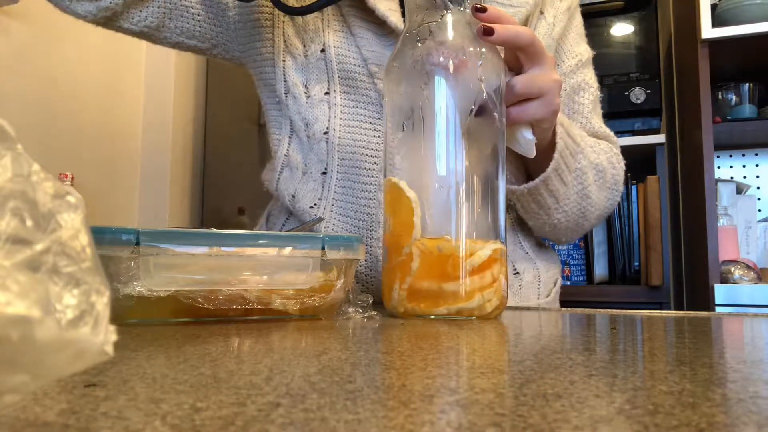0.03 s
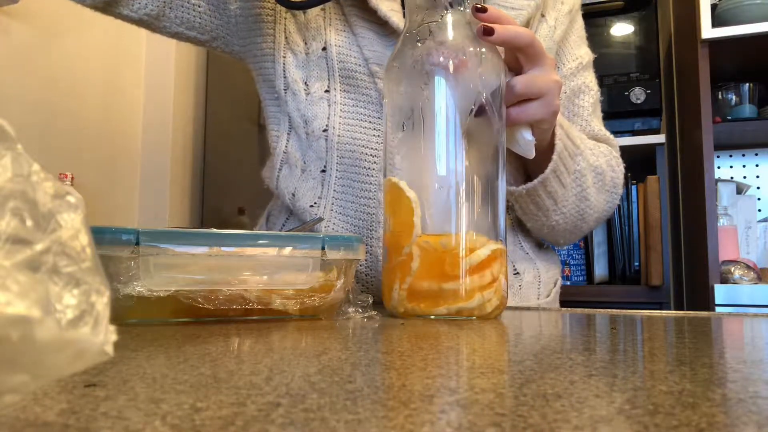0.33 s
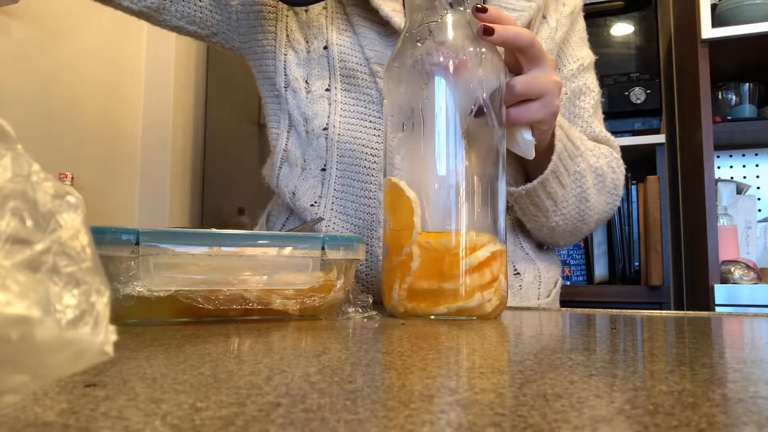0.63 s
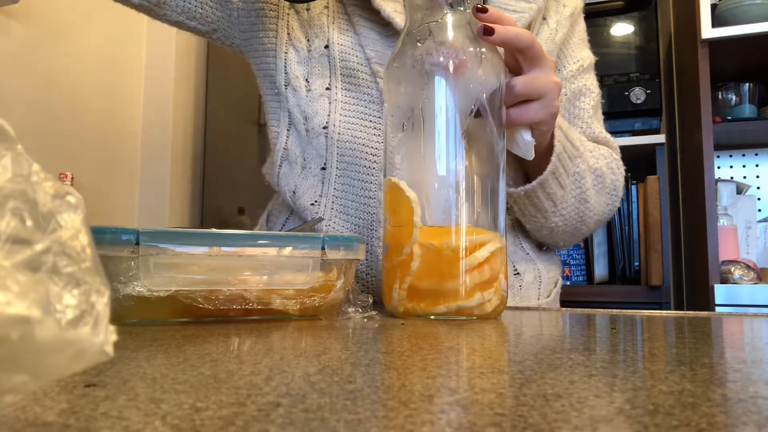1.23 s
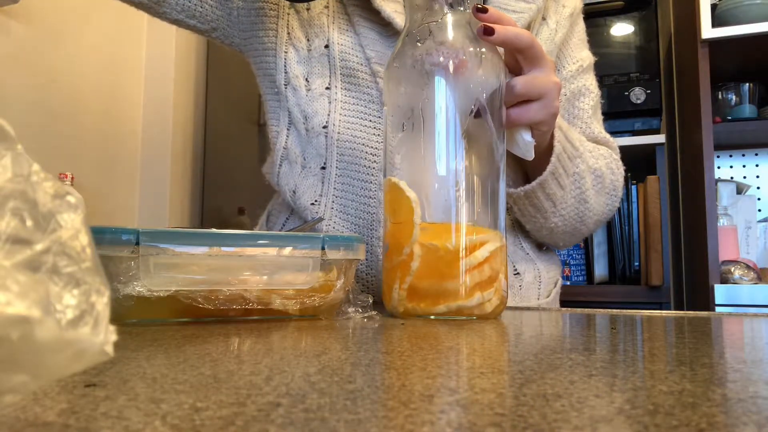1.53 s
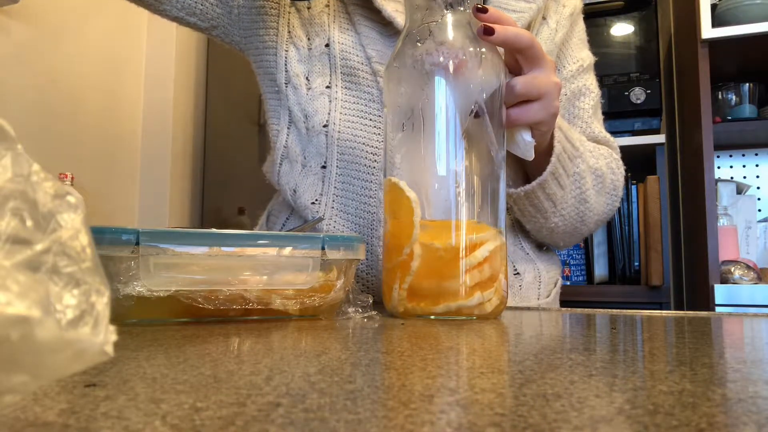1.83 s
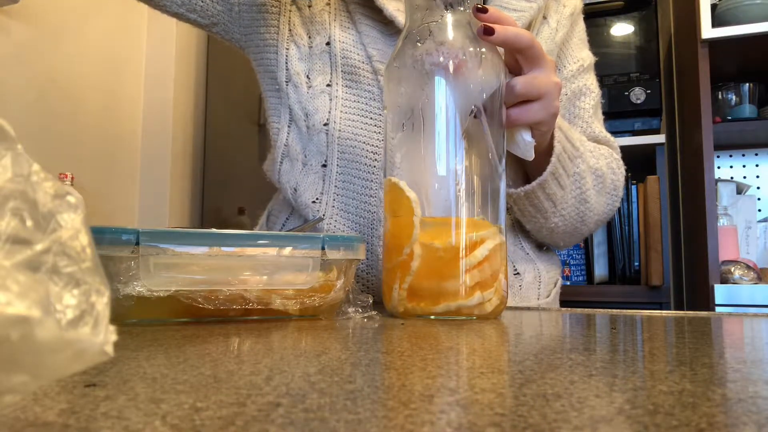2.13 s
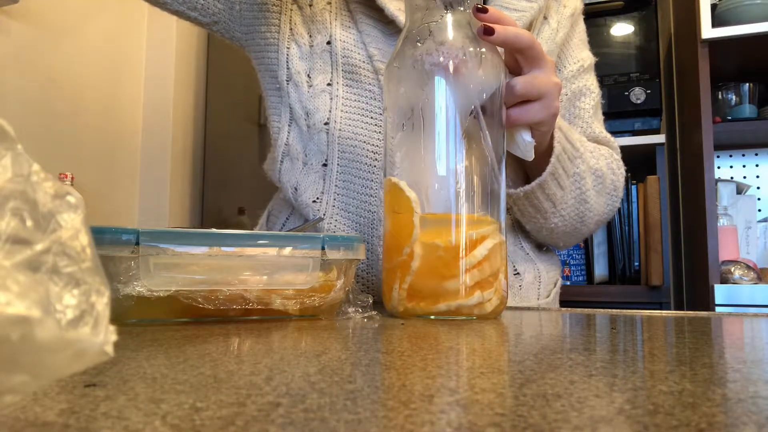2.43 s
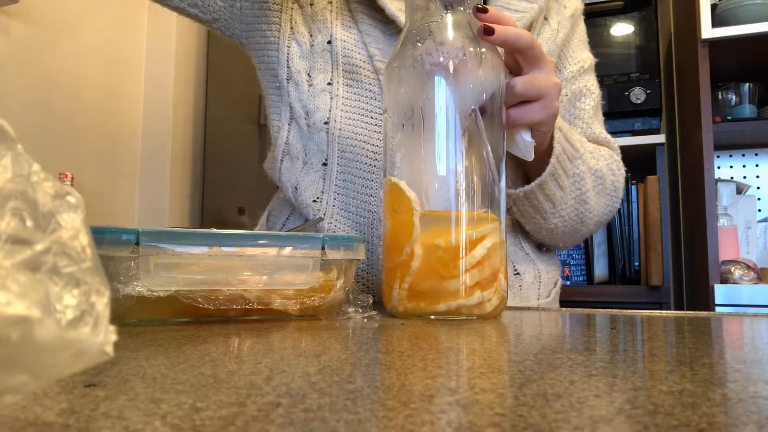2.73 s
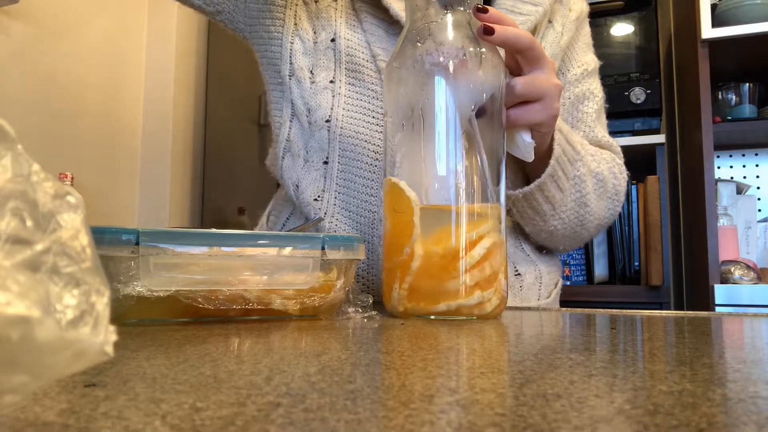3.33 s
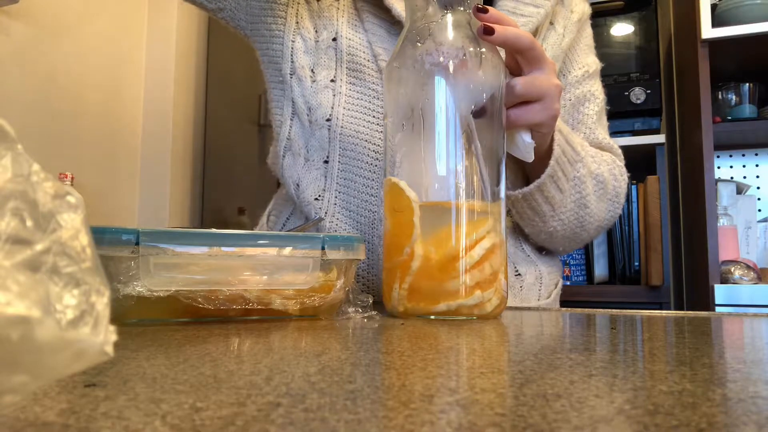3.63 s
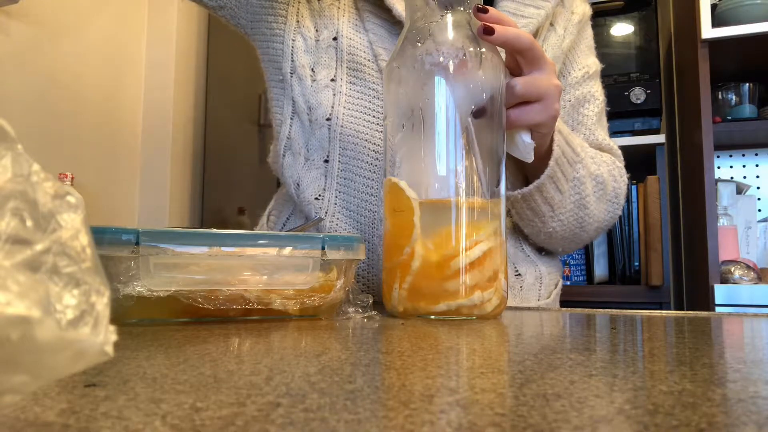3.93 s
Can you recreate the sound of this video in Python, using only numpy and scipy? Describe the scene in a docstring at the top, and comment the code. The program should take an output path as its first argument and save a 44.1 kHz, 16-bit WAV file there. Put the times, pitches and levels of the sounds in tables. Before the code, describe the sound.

A thin pour into a glass bottle starts as light drips and bubbles, with two soft knocks early on, then grows into splashing and gurgling. It is heard up close in a quiet kitchen with steady, low background noise.

```python
"""Filling a glass bottle

Kitchen counter, microphone close to the bottle. A thin stream is poured in: at first it only drips
and ticks, then the flow swells, splashes and gulps. Its bubbles ring the air in the bottle.
A soft double bump comes early on, and low, steady room tone lies under it all."""
import sys
import numpy as np
from scipy import signal
from scipy.fft import rfft, irfft
from scipy.io import wavfile

SR = 44100
rng = np.random.default_rng(int(sys.argv[2]) if len(sys.argv) > 2 else 0)


def dump_mix(stems):
    """Bounce the given channels to the path in sys.argv[1] as a 16-bit WAV at rate SR."""
    frames = np.atleast_2d(stems).T  # one column per channel
    limited = np.clip(frames, -1, 1)  # hard clip at full scale
    pcm = np.round(limited * 32767).astype(np.int16)
    wavfile.write(sys.argv[1], SR, pcm)


N = 176400
TIME = np.arange(N) / SR

# strength of the stream: t/s, level/dB
STREAM_FLOW = [(0, -18), (.7, -20.5), (1.0, -11), (1.4, -18), (1.8, -10), (2.35, -22), (2.58, -14.5),
               (2.7, -3.5), (2.95, -14.5), (3.14, -1.5), (3.3, -3.5), (3.5, -1), (3.75, -2.5), (4, -3)]


def undb(db):
    """Decibels to gain."""
    return 10 ** (np.asarray(db) / 20)


def level(x, db):
    """Scale to an rms level."""
    return x * undb(db) / np.sqrt(np.mean(x ** 2))


def unit_energy(x):
    """Scale so that the squares sum to one."""
    return x / np.sqrt(np.sum(x ** 2))


def fade(t, t60):
    """Exponential decay, 60 dB down at t60."""
    return np.exp(-np.log(1000) * t / t60)


def curve(points):
    """Gain over time from points of t/s, level/dB."""
    return undb(np.interp(TIME, *np.array(points).T))


def wander(per_s):
    """A random drift with a spread near 1."""
    return 1.2 * np.interp(TIME * per_s, np.arange(1000), rng.standard_normal(1000))


def filtered(x, kind, hz, order=2):
    """A gentle low-pass or high-pass."""
    return signal.sosfilt(signal.butter(order, hz, kind, fs=SR, output="sos"), x)


def colour(x, points):
    """Filter by a spectrum of f/Hz, level/dB."""
    hz, db = np.array(points).T
    log_hz = np.log(np.fft.rfftfreq(N, 1 / SR) + 1)
    return irfft(rfft(x) * undb(np.interp(log_hz, np.log(hz), db)), N)


def add(out, start, sound, db):
    """Mix a sound in at a time and a peak level."""
    i = int(np.clip(start * SR, 0, N - 1))
    out[i:i + len(sound)] += (sound * undb(db) / np.abs(sound).max())[:N - i]


def burst(decay_s):
    """A short spatter of noise."""
    t = TIME[:SR // 20]
    return rng.standard_normal(len(t)) * np.exp(-t / decay_s)


def room_tone():
    """The low, steady noise of the kitchen."""
    # noise spectrum: f/Hz, level/dB
    spectrum = [(20, -41), (40, -21), (65, -11.5), (110, -10), (145, -2.5), (161, -6.5), (185, -1),
                (225, -0.5), (255, -4.5), (310, 0), (400, -4.5), (540, -10.5), (760, -11), (1100, -15.5),
                (1600, -23.5), (2200, -28.5), (3500, -38), (6000, -41), (9000, -44.5), (15500, -51)]
    return level(colour(rng.standard_normal(N), spectrum), -52.5)


def bubble(hz, cycles, rise):
    """A bubble rings down 60 dB over `cycles` while its pitch climbs by the share `rise`."""
    age = np.arange(int(cycles * SR / hz) + 2) * hz / SR / cycles
    return np.sin(2 * np.pi * cycles * age * (1 + rise * age / 2)) * fade(age, 1)


def swarm(per_s, low_hz, high_hz, cycles, rise, spread_db, tilt_db):
    """Bubbles of random time, pitch and size; the tilt is per octave."""
    out = np.zeros(N)
    for when, pitch, size, life in rng.random((4000, 4))[:int(per_s * N / SR)]:
        hz = low_hz * (high_hz / low_hz) ** pitch
        db = spread_db * min(-np.log(size), np.pi) + tilt_db * np.log2(hz / low_hz)
        add(out, when * N / SR, bubble(hz, cycles * (.5 + life), rise), db)
    return out


def in_bottle(x):
    """A sound rings the air in the bottle; the dense high resonances differ from spot to spot."""
    # air resonances: f/Hz, width/Hz, level/dB over the direct sound
    air_modes = [(330, 21.3, 19.5), (480, 75, 14.5), (1451, 39, 13.5), (1713, 100, 14), (2620, 83, 15.5),
                 (2946, 143, 18.5), (3165, 10, -13), (3720, 40, 1), (4420, 55, 16), (5770, 100, 10),
                 (6150, 118, 15)]
    t = TIME[:SR // 6]
    direct = signal.unit_impulse(len(t))
    ring = np.zeros(len(t))
    for hz, width, db in air_modes:
        envelope = undb(db) * 2 * np.pi * width / SR * np.exp(-np.pi * width * t)
        ring += envelope * np.cos(2 * np.pi * hz * t)
    shimmer = filtered(rng.standard_normal(len(t)) * fade(t, t60=0.039), "high", hz=3500)
    return signal.fftconvolve(x, direct + ring + unit_energy(shimmer))[:N]


def stream():
    """The stream beats in small bright bubbles and large dull ones, louder with the flow."""
    trickle = swarm(per_s=520, low_hz=765, high_hz=6500, cycles=12.3, rise=0.11,
                    spread_db=3.5, tilt_db=-2)
    burble = swarm(per_s=160, low_hz=206, high_hz=805, cycles=4.9, rise=0.29,
                   spread_db=0, tilt_db=-8.5)
    flow = curve(STREAM_FLOW)
    return level(in_bottle(trickle * flow), -64) + level(in_bottle(burble * flow), -59.5)


def hollow_hum():
    """The stream keeps the air in the bottle humming on its lowest note."""
    hz = 328 * (1 + 0.01208 * wander(per_s=40))
    tone = np.sin(2 * np.pi * np.cumsum(hz) / SR)
    swell = curve(STREAM_FLOW) ** 0.69  # 0.69 dB of hum per dB of flow
    flutter = undb(wander(per_s=30))
    return level(tone * swell * flutter, -60)


def froth():
    """Bursting froth at one spot: high ticks over a fine fizz."""
    pops = swarm(per_s=250, low_hz=3500, high_hz=16600, cycles=20, rise=0.076,
                 spread_db=5, tilt_db=4.5)
    fizz = filtered(rng.standard_normal(N), "high", hz=3500)
    return level(pops, 0) + level(fizz, -16)


def spray(spots=5):
    """Froth at several spots of the surface, coming in quick surges."""
    # strength of the fine spray: t/s, level/dB
    swell = [(0, -11.5), (.8, -12.5), (1.05, -7), (1.4, -7.5), (1.7, -11), (2.0, -8), (2.38, -12),
             (2.58, -4), (2.7, 1.5), (2.87, -5), (2.97, 1), (3.06, -2.5), (3.14, 5), (3.2, -0.5), (3.42, 1),
             (3.55, -3), (3.75, -3), (4, -4.5)]
    # tone shaping of the spray: f/Hz, level/dB
    shaping = [(2500, -12), (4400, 2.5), (5200, -1.5), (6200, 0), (7500, -4.5), (9500, -0.5), (12300, 2),
               (14000, 2), (15500, 1.5)]
    surge_db = 3.5 * np.clip(wander(per_s=46), -2, 2)
    strength = curve(swell) * undb(surge_db)
    wet = sum(in_bottle(froth() * strength) for _ in range(spots))
    return level(colour(wet, shaping), -71.5)


def drips():
    """Single drops each leave a small ringing bubble."""
    # drops: t/s, relative level/dB, f/Hz
    drops = [(.018, -51.5, 2940), (0.205, -51.5, 3030), (0.258, -49.5, 2900), (0.49, -52, 2600),
             (0.501, -54, 3000), (.686, -48, 2800), (.894, -58, 2940), (0.938, -54, 2950),
             (0.966, -49.5, 2780), (.985, -55, 2480), (1.017, -56, 2870), (1.285, -55, 2900),
             (1.3, -47.5, 2930), (1.551, -50.5, 2920), (1.667, -53, 2700), (1.679, -57, 2950),
             (1.71, -61, 2980), (1.762, -57, 2690), (1.741, -46.5, 2800), (1.783, -53, 2620),
             (1.835, -51, 2620), (1.875, -59, 2680), (1.897, -54.5, 2900), (1.985, -46.5, 2610),
             (2.021, -59, 3300), (2.037, -49.5, 2990), (2.07, -49.5, 3500), (2.165, -57, 2640),
             (2.18, -49.5, 3360), (2.197, -56, 2860), (2.22, -53.5, 6300), (2.275, -49.5, 5160),
             (2.497, -47.5, 6150), (2.557, -47, 4200), (2.687, -47, 4670), (2.728, -41.5, 2800),
             (2.741, -43.5, 6150), (2.868, -46, 5900), (2.976, -48, 2620), (3.211, -43, 3200),
             (3.222, -39.5, 2600), (3.451, -42, 3220), (3.489, -43.5, 3860), (3.858, -43.5, 2930),
             (3.995, -34, 2350)]
    out = np.zeros(N)
    for start, db, hz in drops:
        add(out, start, in_bottle(bubble(hz, cycles=24.4, rise=0.036)), db - 0.5)
    return out


def ticks():
    """Droplets tick on the glass, some dull, some bright."""
    # droplet hits: t/s, relative level/dB, treble gain/dB
    droplets = [(0.214, -47.5, -8), (0.491, -52.5, 1), (0.82, -53, 8), (0.948, -53, 5), (1.104, -51, 16),
                (1.196, -57, -4), (1.385, -56, -9), (1.531, -50, -8), (1.575, -56, 19), (1.634, -59, 9),
                (1.753, -55, -13), (1.781, -50, -19), (1.797, -74, -3), (1.887, -53, -6), (2.269, -53, 6),
                (2.406, -57, 3), (2.445, -56, -6), (2.544, -48, 7), (2.623, -56, 12), (2.667, -48, 0),
                (2.853, -49, -7), (3.094, -55, -17), (3.256, -47, -12), (3.381, -42.5, 8), (3.493, -51, 11),
                (3.538, -40, 8), (3.667, -48, 15), (3.877, -50.5, 7), (3.963, -58, -15)]
    out = np.zeros(N)
    for start, db, treble_db in droplets:
        tick = burst(decay_s=0.00095)
        dull = filtered(tick, "low", hz=7500, order=1)
        add(out, start, in_bottle(dull + undb(treble_db) * (tick - dull)), db + 3.5)
    return out


def squirts(width_hz=720):
    """Air and liquid squirt in narrow hisses that swell, glide and fade."""
    # fizzy squirts: t/s, length/s, relative level/dB, first f/Hz, last f/Hz
    hisses = [(0.333, 0.031, -50, 1853, 1720), (0.455, 0.015, -47, 1470, 1790),
              (0.544, 0.025, -50, 1413, 1340), (1.166, 0.093, -55, 2700, 3100),
              (1.305, 0.036, -52.5, 1086, 1560), (1.308, .06, -64.5, 3500, 3600),
              (3.12, 0.034, -51.5, 5440, 5540), (3.372, 0.06, -51, 4180, 3670),
              (3.474, 0.046, -50, 2466, 1880), (3.782, 0.02, -60, 4930, 4900)]
    out = np.zeros(N)
    for start, length, db, first_hz, last_hz in hisses:
        t = TIME[:int(length * SR)]
        grain = filtered(rng.standard_normal(N)[:len(t)], "low", width_hz / 2)
        phase = 2 * np.pi * np.cumsum(np.linspace(first_hz, last_hz, len(t))) / SR
        swell = np.sin(np.pi * t / length) ** .5
        add(out, start, grain * np.sin(phase) * swell, db - 1.5)
    return out


def bumps(contact_s=0.00094):
    """The pouring vessel knocks softly against the bottle, twice."""
    # contacts: t/s, relative level/dB
    contacts = [(1.259, -36.5), (1.288, -33.5)]
    # resonances of a knock: f/Hz, level/dB, t60/s
    modes = [(195, -0.5, 0.073), (308, 7.5, 0.2), (357, 8.5, 0.15), (488, 2.5, 0.1), (590, 0, 0.074),
             (780, -9, 0.057), (910, -22, 0.068)]
    out, t = np.zeros(N), TIME[:SR // 2]
    knock = sum(undb(db) * np.cos(2 * np.pi * hz * t) * fade(t, t60) for hz, db, t60 in modes)
    for start, db in contacts:
        add(out, start, knock * np.minimum(t / contact_s, 1), db + 1.5)
    return out


def splashes():
    """The stream slaps the surface, then scatters droplets."""
    # slaps: t/s, relative level/dB, f/Hz
    slaps = [(2.632, -46, 2980), (2.666, -49, 2800), (2.686, -43, 2590), (2.846, -40, 1890),
             (2.868, -41.5, 1770), (2.897, -42.5, 1740), (2.916, -48, 2400), (2.949, -45, 2000),
             (3.028, -38, 3200), (3.08, -43, 2210), (3.275, -37.5, 2230), (3.363, -46, 1660),
             (3.476, -43, 1850), (3.512, -37.5, 1660), (3.58, -49, 1780), (3.612, -37, 1200),
             (3.625, -45, 2800), (3.712, -32, 1430), (3.761, -41, 1430), (3.801, -37, 1390),
             (3.918, -50, 2500)]
    out = np.zeros(N)
    for start, db, hz in slaps:
        spatter = undb(-3) * unit_energy(burst(decay_s=0.0027))
        hits = signal.unit_impulse(len(spatter)) + spatter
        splash = np.convolve(bubble(hz, cycles=5.8, rise=0), hits)
        add(out, start, in_bottle(splash), db - 1.5)
    return out


def gulps(attack_s=0.0024):
    """Large air pockets, pushed under the surface, ring with a dull wet slosh."""
    # air pockets: t/s, relative level/dB, f/Hz
    pockets = [(2.68, -41, 330), (2.74, -33, 368), (2.805, -41, 322), (2.834, -36.5, 328),
               (2.972, -40.5, 334), (3.087, -35.5, 328), (3.147, -33.5, 385), (3.258, -37.5, 424),
               (3.333, -35.5, 328), (3.371, -39, 346), (3.416, -42, 376), (3.461, -37, 407),
               (3.52, -38.5, 340), (3.618, -31.5, 356), (3.643, -32.5, 370), (3.714, -35, 490),
               (3.721, -31, 342), (3.749, -36.5, 335), (3.829, -40.5, 342), (3.896, -33, 253)]
    out = np.zeros(N)
    for start, db, hz in pockets:
        tone = bubble(hz, cycles=12.5, rise=0.086)
        t = TIME[:len(tone)]
        slosh = filtered(rng.standard_normal(SR)[:len(t)], "low", hz=890)
        slosh = level(slosh, -9.5) * fade(t, t60=t[-1])
        gulp = (tone + slosh) * np.minimum(t / attack_s, 1)
        add(out, start, in_bottle(gulp), db - 1)
    return out


def ting(hz=4056):
    """A light touch makes the glass itself ring once, faintly."""
    out, t = np.zeros(N), TIME[:SR // 2]
    ring = np.sin(2 * np.pi * hz * t) * fade(t, t60=0.2)
    add(out, start=3.025, sound=ring, db=-59.5)
    return out


def kitchen(x):
    """The close sound plus a short, diffuse echo off the counter and walls, weak in the bass."""
    t = TIME[:SR // 2]
    tail = filtered(rng.standard_normal(len(t)) * fade(t, t60=0.14), "high", hz=585)
    return x + undb(-8) * signal.fftconvolve(x, unit_energy(tail))[:N]


def scene():
    """The pour and the bumps at one close microphone, over the room tone."""
    room = room_tone()
    pour = stream() + hollow_hum() + spray()
    pour += drips() + gulps() + splashes() + ticks() + squirts() + bumps() + ting()
    pour = filtered(pour, "high", hz=110)  # the small bottle radiates little bass
    return (room + kitchen(pour))[None]


def record(dry):
    """The recorder cuts the top of the treble."""
    top_hz = 15850
    return signal.sosfilt(signal.ellip(10, .2, 70, top_hz, fs=SR, output="sos"), dry)


dry = scene()
out = record(dry)
dump_mix(out)
```